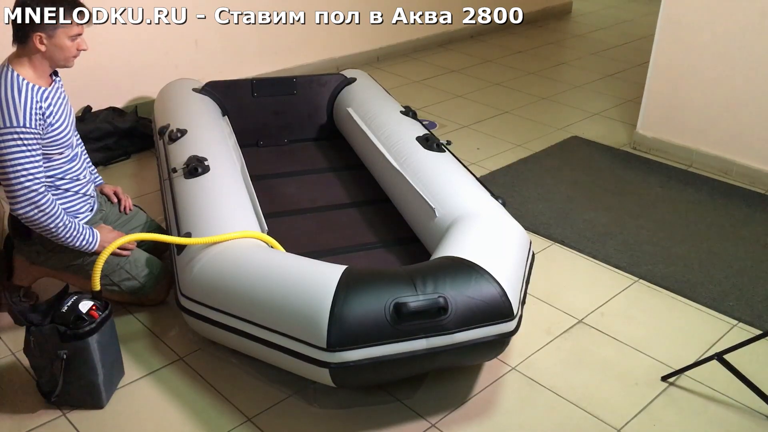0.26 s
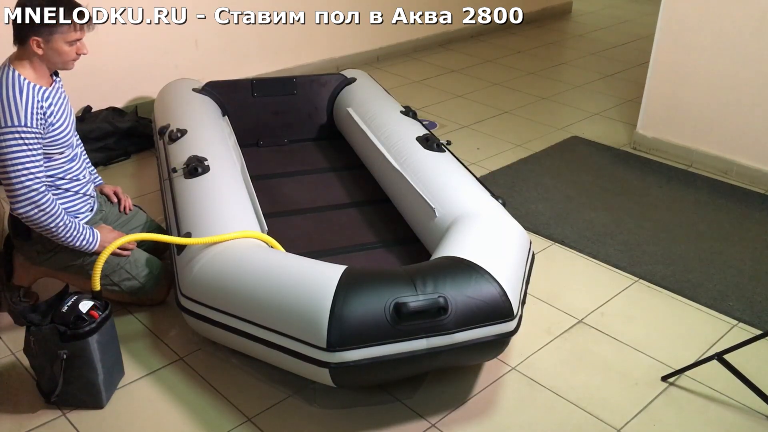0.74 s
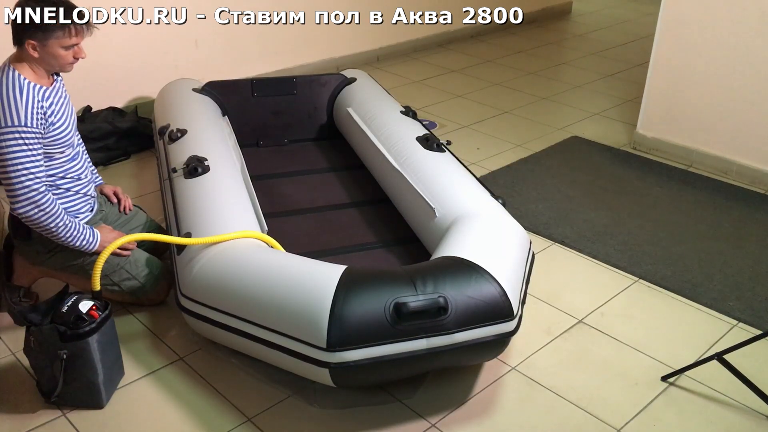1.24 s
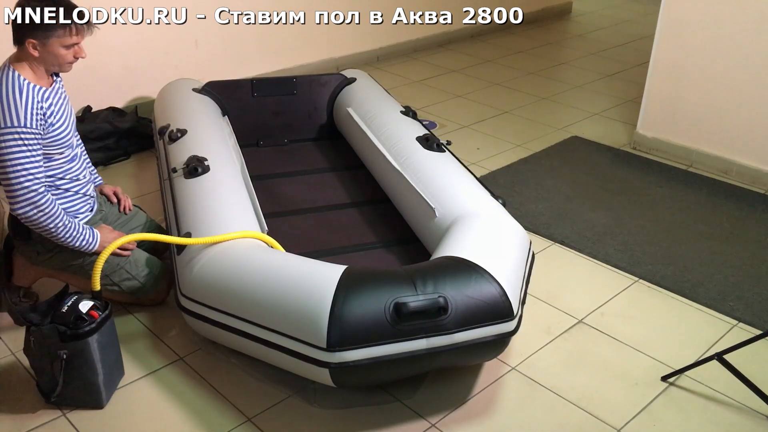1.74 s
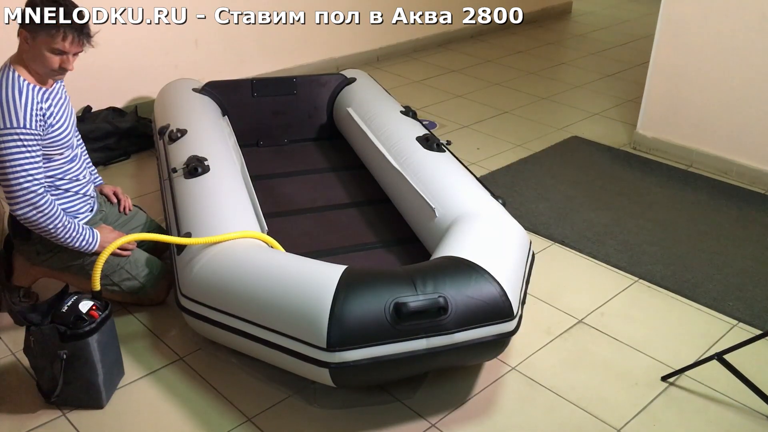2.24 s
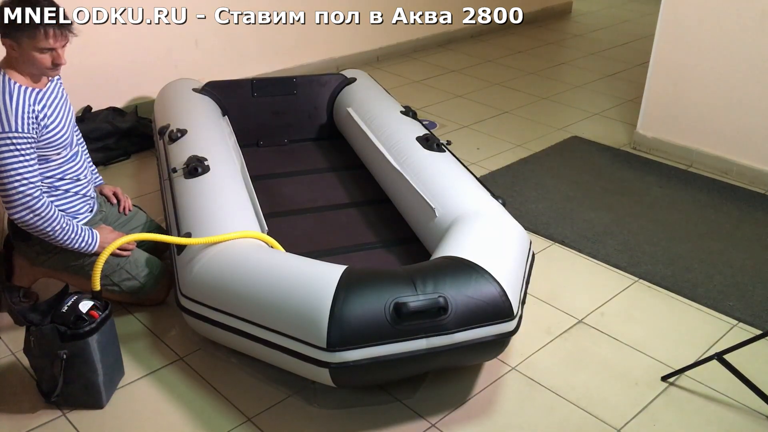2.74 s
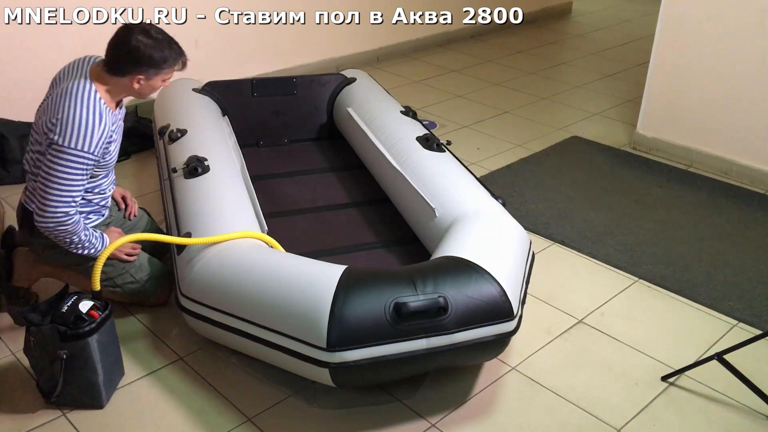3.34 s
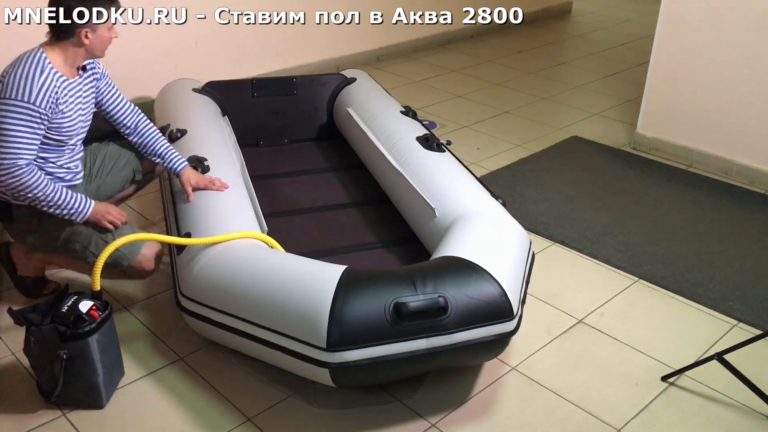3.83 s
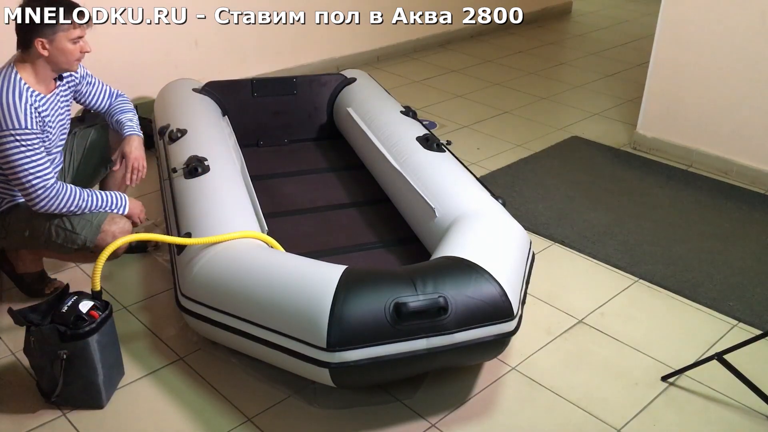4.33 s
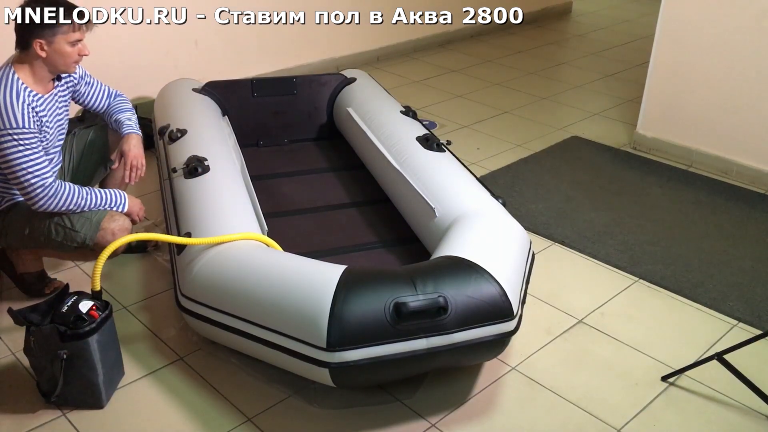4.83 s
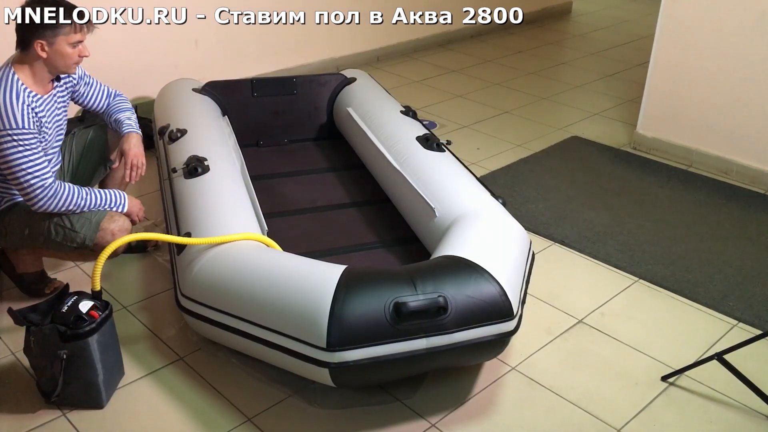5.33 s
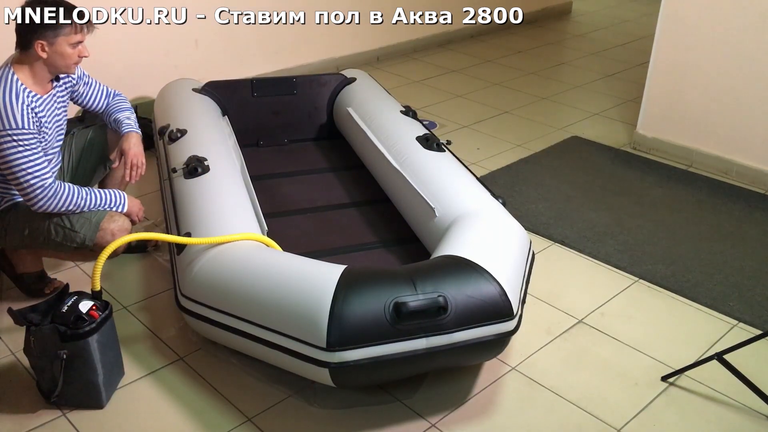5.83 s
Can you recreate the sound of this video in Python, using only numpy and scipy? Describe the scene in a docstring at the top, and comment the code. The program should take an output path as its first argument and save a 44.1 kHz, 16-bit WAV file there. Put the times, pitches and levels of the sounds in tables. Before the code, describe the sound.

A pump fills an inflatable boat indoors. First comes a shrill, fluttering whine over hissing air, already running. A hand smacks the tight tube once, with faint rustling of clothes. The whine then quickly glides down and is cut across by a second pumping stage: a coarse, loud, steady buzz and hum with mechanical rattle, lasting to the end. Close mono pickup with little low bass and short reflections from hard floor and walls.

```python
"""A two-stage electric pump fills an inflatable boat in a tiled hall.
First a fast blower whines (tones at multiples of its rotor rate) and hisses (noise ringing in hose and housing),
then it is switched off and runs down. A geared piston stage starts with a loud buzz of motor and crank
harmonics and a noisy rattle. A hand pats the taut tube, and something knocks it softly later: short blows ring it.
Behind are a low background, a brief hum and a rustle; the sound is mono and thin in the bass."""
import sys
import numpy as np
from scipy import signal
from scipy.fft import rfft, irfft, next_fast_len
from scipy.io import wavfile

SR = 44100
rng = np.random.default_rng(int(sys.argv[2]) if len(sys.argv) > 2 else 0)


def unload_audio(sound):
    """Save the sound as a 16-bit wav file, at the path given as the first command line argument."""
    columns = np.transpose(np.atleast_2d(sound))
    # keep every value between -1 and 1, then stretch to whole-number steps
    steps = np.round(np.clip(columns, -1, 1) * 32767)
    wavfile.write(sys.argv[1], SR, steps.astype(np.int16))


N = 267687   # length in samples

CUTOFF_HZ = 15710   # nothing is kept above this
LOADED_HZ = 149.7   # motor turns per second that the piston stage sinks to as pressure builds
GEAR = 3   # motor turns for one crank turn

# Resonances and gaps that the falling blower tones sweep through.
# Each row: centre in Hz, width in Hz, gain in dB at the centre.
SWEPT_PEAKS = [(715, 32, 7.5), (785, 40, -10), (913.7, 40, 9.5), (1460, 44, 15.5), (1620, 72, -10),
               (2120, 50, 16), (5630, 350, 9.5), (6640, 200, -1), (9820, 124, 20), (10700, 260, -6),
               (13590, 410, -11)]
# Colour of the valve and gear rattle. Each row: frequency in Hz, relative level in dB per Hz.
RATTLE_COLOUR = [(30, -14), (120, -27.5), (240, -19.5), (380, -12), (700, -15), (1600, -16.5), (2000, -11),
                 (4300, -14.5), (5500, -18), (9200, -19.5), (9900, -28.5), (11500, -20), (14000, -23.5),
                 (15900, -23)]


def from_db(db):
    """Turn decibels into gain."""
    return 10 ** (np.asarray(db) / 20)


def rms_one(x):
    """Scale a sound to an rms of 1."""
    return x / np.sqrt(np.mean(x ** 2) + 1e-20)


def in_time(rows):
    """Draw straight lines between the rows of a table: each column gets one value a sample."""
    s, *columns = np.transpose(rows)
    return [np.interp(np.arange(N) / SR, s, column) for column in columns]


def gate(rows, fade_s):
    """Fade in from a table's first time (at once if that is 0) and out after its last."""
    t = np.arange(N) / SR
    starts_open = rows[0][0] == 0
    fade_in = np.clip((t - rows[0][0]) / fade_s + starts_open, 0, 1)
    fade_out = np.clip((rows[-1][0] - t) / fade_s + 1, 0, 1)
    return fade_in * fade_out


def drift(rate, size=N):
    """Slow random wander of rms about 1: noise through two equal low-passes at this rate in Hz."""
    step = 20   # computed at every 20th sample, then joined by lines
    r = np.exp(-2 * np.pi * rate * step / SR)
    white = rng.standard_normal(size // step + 4002)
    slow = signal.lfilter([1], [1, -2 * r, r * r], white)[4000:]   # skip the filter's start
    return np.interp(np.arange(size) / step, np.arange(len(slow)), rms_one(slow))


def coloured(white, spectrum):
    """Shape noise to a smooth spectrum, drawn over log frequency, with an rms of 1."""
    hz, db = np.transpose(spectrum)
    size = next_fast_len(N)
    bins = np.arange(size // 2 + 1) * SR / size + 1   # 1 Hz up, so the log exists
    gain = from_db(np.interp(np.log(bins), np.log(hz), db))
    return rms_one(irfft(rfft(white, size) * gain, size)[:N])


def resonances(white, modes, shift=0):
    """Ring noise in parallel resonances; a fourth column changes each level as shift goes from 0 to 1."""
    out = 0
    for k, (hz, width, db, *change_db) in enumerate(modes):
        r = np.exp(-np.pi * width / SR)
        rung = signal.lfilter([1, 0, -1], [1, -2 * r * np.cos(2 * np.pi * hz / SR), r * r], white)
        sign = (-1) ** k   # neighbours have opposite signs
        out = out + sign * from_db(db + sum(change_db) * shift) * rms_one(rung)
    return out


def tone(phase, flutter_db, rate, blur):
    """A sine of rms about 1 whose level (dB) and phase (blur, rad) waver as reflections mix."""
    wavering_phase = phase + blur * drift(rate, len(phase)) + rng.uniform(0, 2 * np.pi)
    return np.sqrt(2) * from_db(flutter_db * drift(rate, len(phase))) * np.sin(wavering_phase)


def swept(hz, peaks):
    """Gain of a gliding tone as it crosses bell-shaped peaks and gaps."""
    return from_db(sum(db * np.exp(-.5 * ((hz - centre) / width) ** 2) for centre, width, db in peaks))


def blower():
    """A rotor held at speed, then braked by air drag once off, drives both the tones and the air rush."""
    # Rotor speed under power. Each row: time in seconds, rotor tone in Hz.
    rotor = [(0, 998.5), (.38, 1001.2), (.76, 1002.5), (1.5, 1004.4), (2.1, 1005.2), (2.8, 1006.6),
             (4.1, 1006.3)]
    # Air under power. Each row: time in seconds, rush in dB, strength of the housing resonances in dB.
    air_levels = [(0, -37.5, 2.5), (1.2, -38, 4.5), (3.25, -39.5, 4.5), (3.5, -35, 0.5), (3.8, -35, 2.5),
                  (4.12, -35, 6.5)]
    switch_off_s, drag = 4.122, 2.4   # seconds; braking per second
    rush_power = 1.6   # coasting: the rush falls as speed to this power
    lean_s, lean_takes_s = 3.14, .25   # someone leans over the tube beside the pump, changing its colour
    end_s, fade_s = 4.46, 0.027   # lost under the piston stage
    t = np.arange(N) / SR
    coasting = np.clip(t - switch_off_s, 0, None)   # seconds since switch-off
    speed = 1 / (1 + drag * coasting)   # 1 is the speed under power
    hz = in_time(rotor)[0] * speed
    turn = 2 * np.pi * np.cumsum(hz) / SR
    leaning = np.clip((t - lean_s) / lean_takes_s, 0, 1)
    rush_db, ring_db = in_time(air_levels)
    rush = from_db(rush_db) * speed ** rush_power
    running = np.clip(1 - (t - end_s) / fade_s, 0, 1)
    whine = strong_tones(hz, turn, speed, coasting) + rush * weak_tones(hz, turn, coasting, leaning)
    return running * whine, running * rush * air_rush(ring_db, coasting, leaning)


def strong_tones(hz, turn, speed, coasting):
    """The rotor tone and its 2nd, 7th and 14th multiples swell and sink, then die away with the speed."""
    # Whine before coasting and swept peaks.
    # Each row: time in seconds, rotor tone in dB, 7th multiple in dB.
    whine_levels = [(0, -36, -20.5), (.3, -39.5, -39), (.55, -37.5, -26), (1.15, -36.5, -32),
                    (1.5, -39, -44.5), (1.85, -39.5, -40), (2.05, -39.5, -43), (2.3, -39, -35.5),
                    (2.55, -40.5, -44.5), (2.75, -43, -37.5), (3.1, -41.5, -52), (3.35, -36.5, -37.5),
                    (3.6, -32.5, -31), (3.82, -27, -28.5), (3.91, -30, -42), (4.0, -29, -26),
                    (4.12, -32, -29.5)]
    # The 14th multiple before its fading and swept peaks. Each row: time in seconds, level in dB.
    fourteenth_levels = [(0, -39), (.3, -32), (.6, -39), (.9, -32), (1.85, -31.5), (2.05, -42), (2.55, -33),
                         (2.95, -51), (3.25, -33.5), (3.65, -40), (4.05, -34)]
    coast_power, break_up_db = 4.5, 2   # coasting tones fall as speed to this power and flicker as they glide
    echo_share, echo_turns = .6, 0.74   # a shifting echo of this share; its phase swing in rad
    first_db, seventh_db = in_time(whine_levels)
    second_db = -49.5 + 0.74 * (first_db + 37)   # follows most of the rotor tone's swing
    # dips where the shifting echo cancels the tone
    fading = np.abs(1 + echo_share * np.exp(1j * echo_turns * drift(4.2))) / (1 + echo_share)
    fourteenth = from_db(in_time(fourteenth_levels)[0]) * fading
    whine = from_db(first_db) * swept(hz, SWEPT_PEAKS) * tone(turn, flutter_db=0.84, rate=41, blur=0.03)
    whine += from_db(second_db) * swept(2 * hz, SWEPT_PEAKS) * tone(
        2 * turn, flutter_db=1.5, rate=26.0, blur=0.59)
    whine += from_db(seventh_db) * swept(7 * hz, SWEPT_PEAKS) * tone(
        7 * turn, flutter_db=1.34, rate=13, blur=0.13)   # 7 blades pass each turn
    whine += fourteenth * swept(14 * hz, SWEPT_PEAKS) * tone(14 * turn, flutter_db=3.3, rate=11, blur=0.33)
    return whine * speed ** coast_power * from_db(break_up_db * (coasting > 0) * drift(45))


def weak_tones(hz, turn, coasting, leaning):
    """Fainter multiples of the rotor tone, which follow the level of the air rush."""
    # Each row: multiple of the rotor tone, level in dB against the air rush,
    # gain in dB once coasting into the housing resonances, gain in dB after the lean.
    weak_multiples = [(3, -10.5, 1, 0.5), (4, -18, -6, 3), (5, -22.5, -16, 0), (6, -28, -6, -1),
                      (10, -28, -4, -6), (21, -14, 1, -1)]
    out = np.zeros(N)
    coasted = np.minimum(coasting / 0.14, 1)   # full 0.14 s after switch-off
    for multiple, db, coast_db, lean_db in weak_multiples:
        audible = multiple * hz < CUTOFF_HZ
        gain = from_db(db + lean_db * leaning + coast_db * coasted)
        partial = tone(multiple * turn, flutter_db=-1.0, rate=12, blur=0.33)
        out += audible * swept(multiple * hz, SWEPT_PEAKS) * gain * partial
    return out


def air_rush(ring_db, coasting, leaning):
    """Turbulent air hisses freely and rings the hose and housing; the ringing drops out when coasting."""
    # Colour of the free hiss. Each row: frequency in Hz, relative level in dB per Hz.
    hiss_colour = [(24, -72), (40, -23), (484, -15), (859, -14.5), (997, -10.5), (1100, -11), (2450, -6),
                   (2840, -5.5), (3300, -10.5), (3930, -6.5), (6470, -13.5), (6970, -10.5), (8510, -16),
                   (14400, -33), (15500, -14.5)]
    # Hose and housing, excited by the air.
    # Each row: frequency in Hz, width in Hz, relative level in dB, change in dB after the lean.
    housing = [(508, 57, -23.5, -5.5), (2180, 32, -13, -3), (2477, 33, -5.5, -6.5), (3223, 69, -11, 3.5),
               (2550, 310, -18.5, 9.5), (3333, 35, -6, -2), (3680, 28, -19.5, 1.5), (5250, 370, -14, -6),
               (6000, 50, -19, -1.5), (9800, 430, -14, -1), (11900, 63, -23, 0.5), (12400, 320, -21, -2.5),
               (13500, 370, -11.5, -2.5)]
    ring_loss_db, ring_loss_s = 13, 0.19   # size of the drop and how long it takes
    free, ducted = rng.standard_normal((2, N)) * from_db(0.95 * drift(41))   # turbulence comes in lumps
    ring = from_db(ring_db - ring_loss_db * np.minimum(coasting / ring_loss_s, 1))
    return coloured(free, hiss_colour) + ring * resonances(ducted, housing, leaning)


def piston():
    """The motor spins up, then sags as pressure builds; hum, buzz and rattle follow its turning."""
    motor_on_s, spin_up_s = 4.449, .016   # power on; time constant
    sag_hz, sag_s = 2.8, .7   # how far above the loaded speed it heads at first; time constant
    rattle_db, buzz_power = -28, 1.8   # level of rattle and buzz; the buzz grows as speed to this power
    jolt_db, jolt_s, rise_s = 12, 0.014, 0.024   # extra rattle at the start, its decay; fade-in
    start = round(motor_on_s * SR)
    on = np.arange(N - start) / SR   # seconds since power on
    speed = 1 - np.exp(-on / spin_up_s)
    hz = speed * (LOADED_HZ + sag_hz * np.exp(-on / sag_s))
    turn = 2 * np.pi * np.cumsum(hz) / SR
    rise = np.minimum(on / rise_s, 1)
    lurch = from_db(jolt_db * np.exp(-on / jolt_s)) * rise ** 1.8   # rough before the tones settle
    hum = rise ** 3 * stroke_hum(hz, turn, speed, start)
    noisy = speed ** buzz_power * motor_buzz(turn) + lurch * gear_rattle(turn, start)
    return np.pad(hum + from_db(rattle_db) * noisy, (start, 0))


def stroke_hum(hz, turn, speed, start):
    """The 2nd, 4th and 8th multiples of the motor rate, boosted as spin-up sweeps them through peaks."""
    # Upper hum at full speed. Each row: time in seconds, 4th multiple in dB, 8th multiple in dB.
    upper_hum = [(4.5, -26, -34), (4.7, -28, -44), (4.85, -27.5, -31.5), (5.15, -29.5, -31),
                 (5.45, -30, -54), (6.07, -29.5, -38)]
    # Peaks crossed while spinning up. Each row: centre in Hz, width in Hz, gain in dB at the centre.
    spin_peaks = [(280, 7.4, 6.5), (450, 28, 5), (980, 55, 10)]
    stroke_db, stroke_power = -21, 6.5   # 2nd multiple at full speed; it grows as speed to this power
    fourth_db, eighth_db = np.array(in_time(upper_hum))[:, start:]
    second = from_db(stroke_db) * speed ** stroke_power
    hum = second * swept(2 * hz, spin_peaks) * tone(2 * turn, flutter_db=1.0, rate=7.2, blur=0.048)
    hum += from_db(fourth_db) * swept(4 * hz, spin_peaks) * tone(4 * turn, flutter_db=0.34, rate=16, blur=.1)
    hum += from_db(eighth_db) * swept(8 * hz, spin_peaks) * tone(8 * turn, flutter_db=2.5, rate=4.3, blur=0.11)
    return hum


def motor_buzz(turn):
    """Many harmonics of the motor turn and of the slower crank turn add up to a buzz."""
    # Each row: multiple of the motor rate, level in dB against the rattle.
    motor_orders = [(1, -32), (3, -10.5), (5, -21), (6, -15), (7, -14.5), (9, -12.5), (10, -16.5),
                    (11, -18), (12, -18), (13, -11), (15, -16), (16, -11), (17, -24), (18, -11), (19, -29),
                    (20, -36), (21, -34), (22, -18.5), (23, -24), (24, -13.5), (25, -30.5), (26, -15.5),
                    (27, -17), (28, -14), (29, -19), (30, -23)]
    # Each row: multiple of the crank rate, level in dB against the rattle.
    crank_orders = [(16, -11.5), (19, -25), (20, -19), (22, -18), (25, -15), (26, -38), (29, -20)]
    high_db, high_spread_db = -7.5, 1   # upper partials against the rattle colour; their random spread
    buzz = 0
    for multiple, db in motor_orders:
        unsteady = 0.11 * np.sqrt(multiple)   # higher partials waver more
        buzz = buzz + from_db(db) * tone(multiple * turn, flutter_db=unsteady, rate=6.3, blur=unsteady)
    for multiple, db in crank_orders:
        buzz = buzz + from_db(db) * tone(multiple / GEAR * turn, flutter_db=4.5, rate=2.6, blur=0.28)
    # contacts that repeat every turn give faint uneven upper partials
    for multiple in range(31, 96):
        colour_db = np.interp(multiple * LOADED_HZ, *np.transpose(RATTLE_COLOUR))
        db = high_db + colour_db + high_spread_db * rng.standard_normal()
        buzz = buzz + from_db(db) * tone(multiple * turn, flutter_db=2.5, rate=13.0, blur=0.5)
    return buzz


def gear_rattle(turn, start):
    """Valve and gear noise rings the casing and pulses gently with the motor and crank turns."""
    # Casing of the piston stage. Each row: frequency in Hz, width in Hz, relative level in dB.
    casing = [(271, 65, -18.5), (1270, 340, -4), (2200, 100, -14), (2340, 120, -6.5), (4180, 300, -23),
              (9130, 83, -16), (12000, 150, -37)]
    pulsing = 1 + 0.091 * np.cos(turn) + 0.073 * np.cos(2 * turn) + 0.044 * np.cos(turn / GEAR)
    white = rng.standard_normal(N) * from_db(0.79 * drift(23))
    return (coloured(white, RATTLE_COLOUR) + resonances(white, casing))[start:] * pulsing


def pats():
    """Blows ring the taut tube along with a short crack; a duller blow wakes the upper modes less."""
    # Blows on the tube. Each row: time in seconds, relative level in dB, brightness in dB per octave,
    # relative level of the crack in dB.
    blow_rows = [(3.603, -22.5, -4.5, -23), (3.612, -34.5, 8, -37), (3.633, -43, 7, -44),
                 (4.312, -39.5, 0.5, -65)]
    # Ringing modes of the tube.
    # Each row: frequency in Hz, relative level in dB, time in seconds to fall by 60 dB.
    tube = [(132, -9, 0.061), (300, 3, 0.029), (430, -8, 0.06), (618, -7, 0.13), (725, 4.5, 0.054),
            (930, -5.5, .06), (1180, -4.5, 0.02), (3040, -23, .01)]
    crack_decay_s, palm_cut_hz = 0.0039, 230   # time constant of the palm's crack; bass cut of all blows
    out = np.zeros(N)
    for hz, mode_db, t60 in tube:
        blows = np.zeros(N) + 1e-18
        for s, db, bright_db, _ in blow_rows:
            blows[round(s * SR)] = from_db(db + mode_db + bright_db * np.log2(hz / 300))
        r, w = from_db(-60 / (t60 * SR)), 2 * np.pi * hz / SR
        out += signal.lfilter([0, np.sin(w)], [1, -2 * r * np.cos(w), r * r], blows)
    cracks = np.zeros(N) + 1e-18
    for s, *_, crack_db in blow_rows:
        cracks[round(s * SR)] = from_db(crack_db)
    dying = signal.lfilter([1], [1, -np.exp(-1 / (crack_decay_s * SR))], cracks) * rng.standard_normal(N)
    out += signal.sosfilt(signal.butter(2, [1500, 4800], "band", fs=SR, output="sos"), dying)
    return signal.sosfilt(signal.butter(2, palm_cut_hz, "high", fs=SR, output="sos"), out)


def hall():
    """Low filtered noise, a short wavering hum and the dull rustle of clothes and floor as someone shifts."""
    # A brief low hum. Each row: time in seconds, level in dB.
    hum_levels = [(2.8, -66), (2.88, -51), (2.95, -62), (3.15, -66), (3.22, -76)]
    # Clothes and floor. Each row: time in seconds, level in dB.
    rustle_levels = [(3.3, -76), (3.75, -58), (4.4, -63)]
    hum_hz, rumble_db = 123.4, -69
    low = signal.butter(2, [60, 300], "band", fs=SR, output="sos")
    dull = signal.butter(2, [100, 600], "band", fs=SR, output="sos")
    low_noise = rms_one(signal.sosfilt(low, rng.standard_normal(N)))
    dull_noise = rms_one(signal.sosfilt(dull, rng.standard_normal(N)))
    rumble = from_db(rumble_db + 1.6 * drift(5.5)) * low_noise
    rustle = from_db(in_time(rustle_levels)[0] + 1.1 * drift(13)) * dull_noise
    hum_phase = 2 * np.pi * hum_hz * np.arange(N) / SR
    hum = from_db(in_time(hum_levels)[0]) * tone(hum_phase, flutter_db=1.0, rate=8, blur=.2)
    return rumble + gate(rustle_levels, 0.29) * rustle + gate(hum_levels, 0.045) * hum


def echoes(x):
    """Direct sound plus reflections from floor and walls; gliding tones beat against their own echoes."""
    # Each row: delay in milliseconds, level in dB against the direct sound.
    reflections = [(6.5, -7), (11.3, -11), (15.1, -14), (19.7, -14), (25.9, -17), (33, -19), (41, -21),
                   (52, -24)]
    out = x.copy()
    for ms, db in reflections:
        lag = round(ms * SR / 1000)
        out[lag:] += from_db(db) * x[:-lag]
    return out


def scattered(x):
    """Direct sound plus a dense dying tail of reflections, which ripples the colour of noise."""
    tail_db, t60_s = -8.5, 0.12   # tail against the direct sound; time to fall by 60 dB
    t = np.arange(SR // 4) / SR
    tail = rng.standard_normal(len(t)) * from_db(-60 * t / t60_s) * (t > .003)
    tail = tail / np.sqrt(np.sum(tail ** 2))
    return x + from_db(tail_db) * signal.fftconvolve(x, tail)[:N]


def scene():
    """All sources add up in two equal channels; the whine gets single echoes, rush and blows the dense tail."""
    whine, air = blower()
    return np.tile(echoes(whine) + scattered(air + pats()) + piston() + hall(), (2, 1))


def record(dry):
    """The microphone drops the deep bass; a steep low-pass cuts the top."""
    bass_cut_hz = 111
    thin = signal.sosfilt(signal.butter(2, bass_cut_hz, "high", fs=SR, output="sos"), dry)
    return signal.sosfilt(signal.ellip(16, .5, 72, CUTOFF_HZ, fs=SR, output="sos"), thin)


dry = scene()
out = record(dry)
unload_audio(out)
```